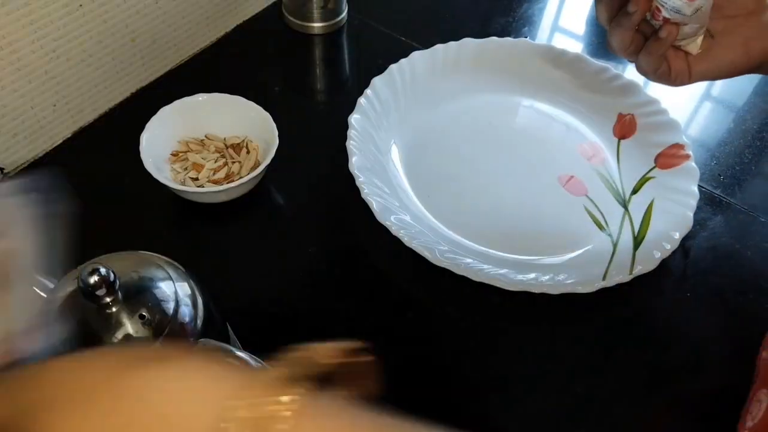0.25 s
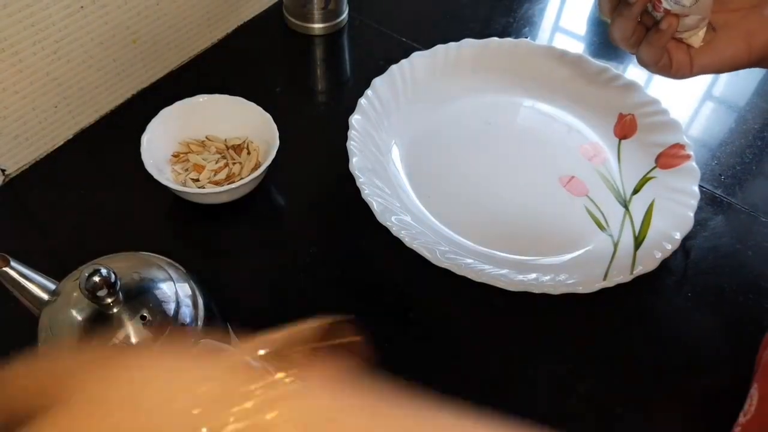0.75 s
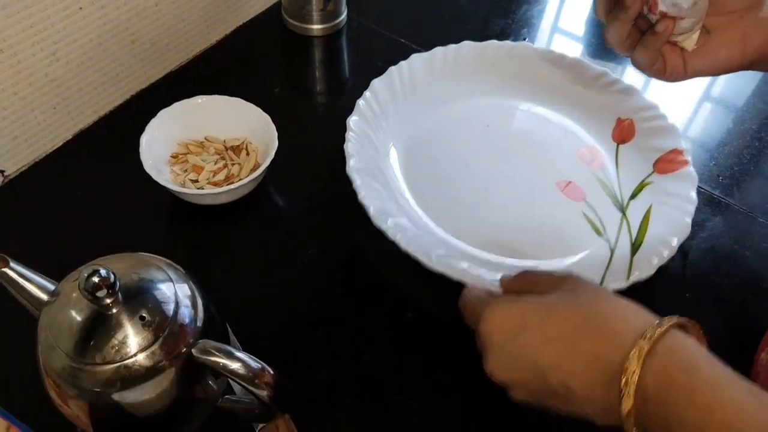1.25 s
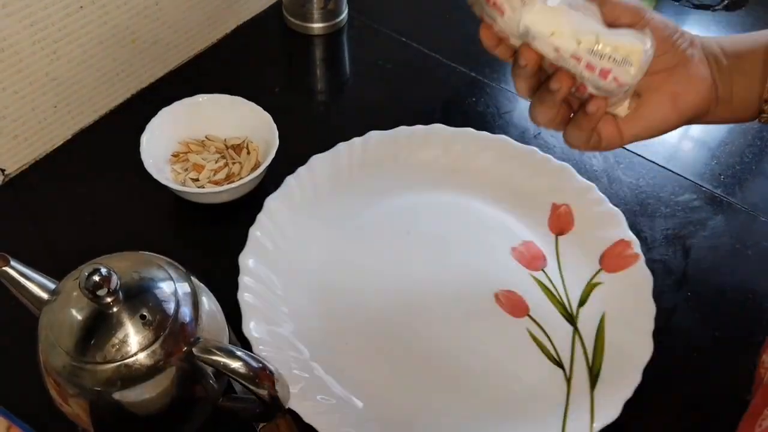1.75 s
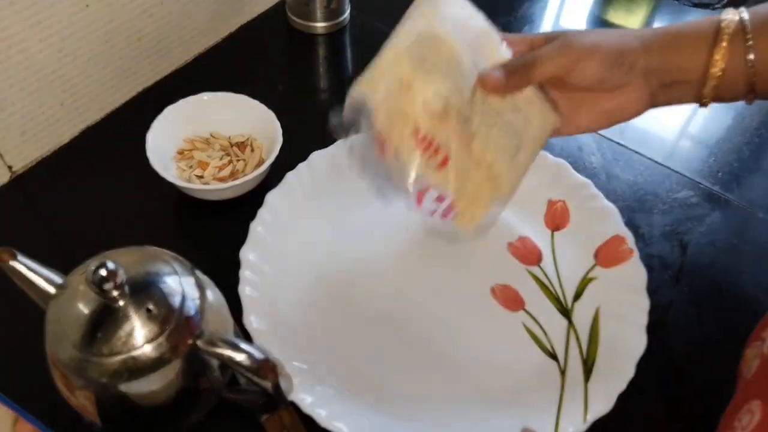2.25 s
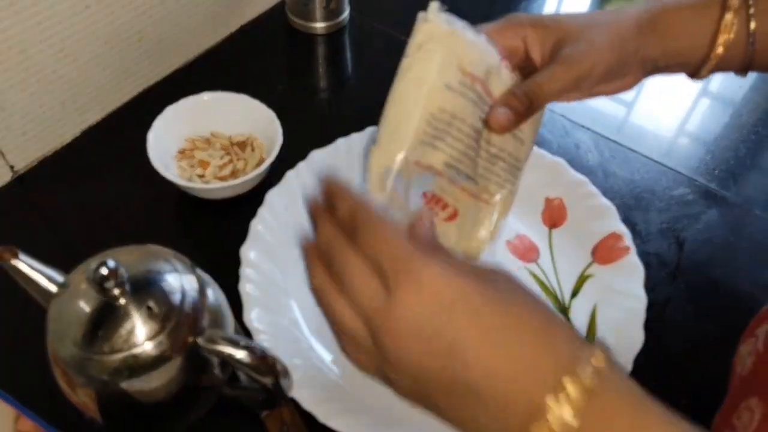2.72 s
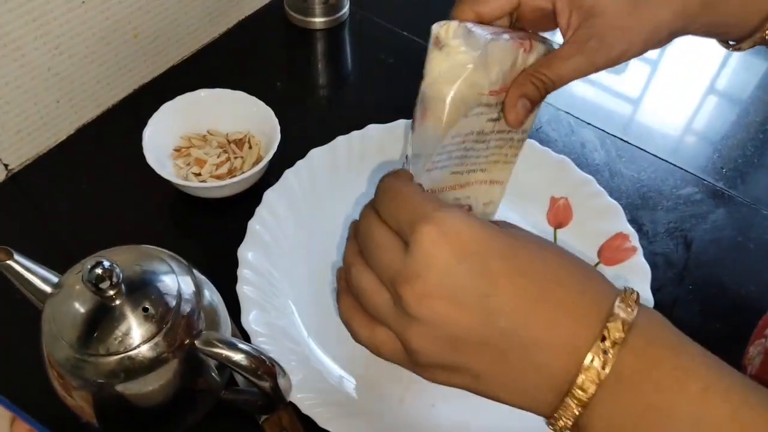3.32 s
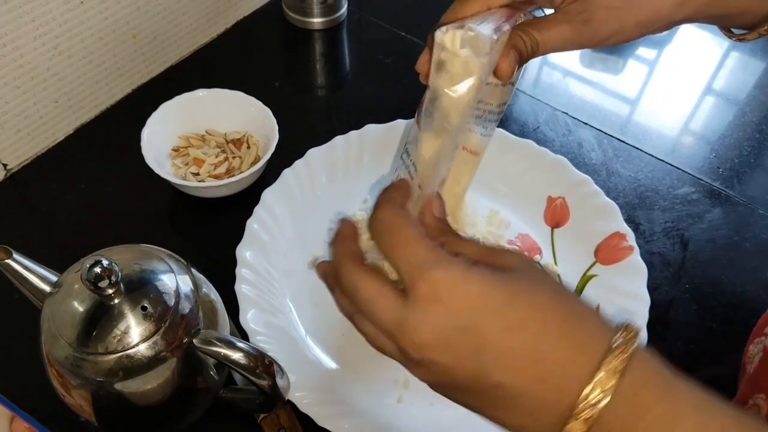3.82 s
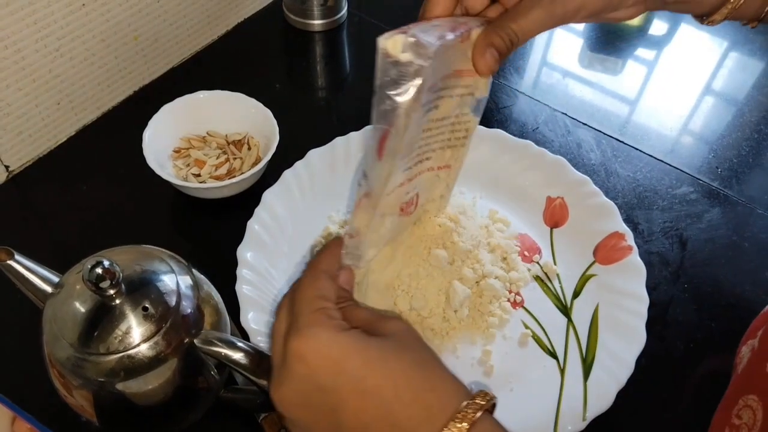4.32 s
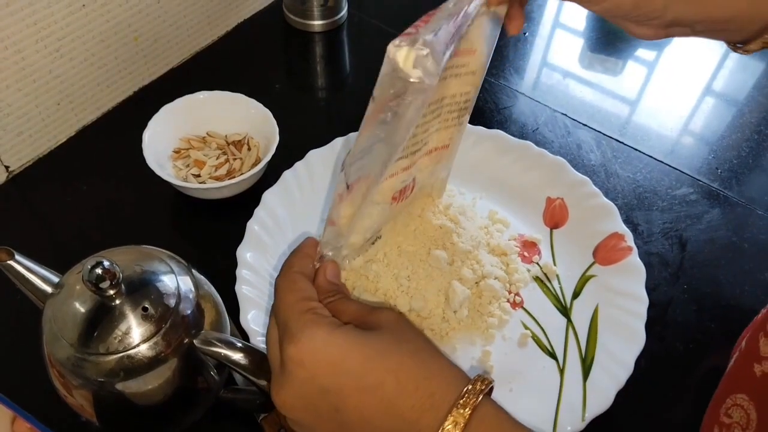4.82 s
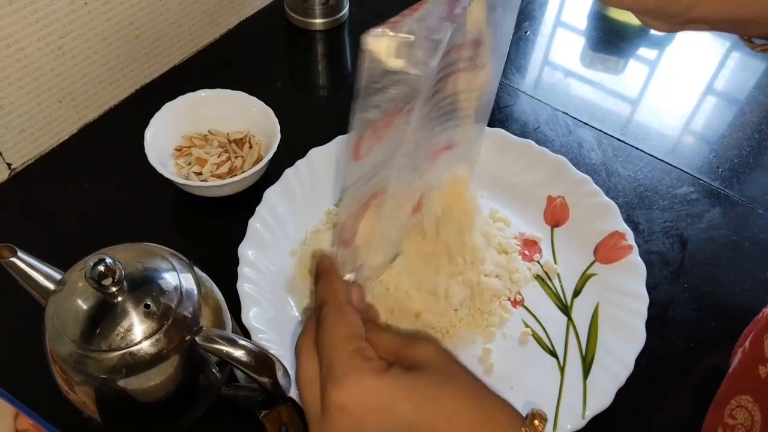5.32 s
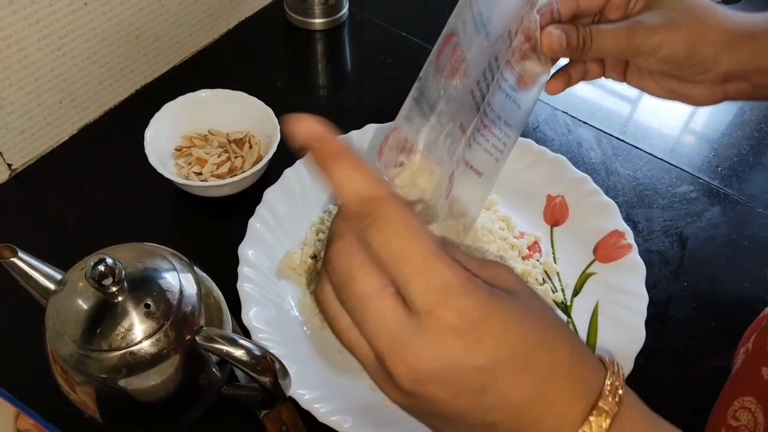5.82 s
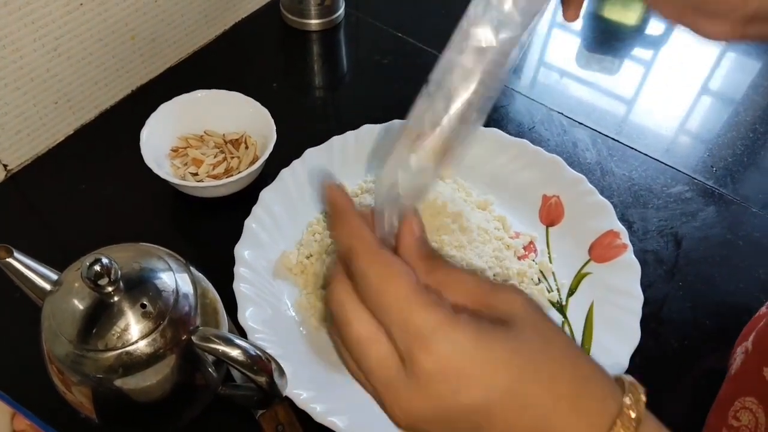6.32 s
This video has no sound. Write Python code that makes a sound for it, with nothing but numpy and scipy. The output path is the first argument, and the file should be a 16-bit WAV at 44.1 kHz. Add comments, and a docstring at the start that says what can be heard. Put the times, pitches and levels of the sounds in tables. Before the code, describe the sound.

In a small hard-walled kitchen with a steady low fan drone, an outer packet crackles briefly and lands with a soft thud. A sharp hollow knock and lighter bumps hit the counter, then a plate is dragged with a gritty, ringing rasp. After that a thin plastic pouch crinkles and snaps continuously while powder slumps out in soft, dull thumps. Close stereo microphones.

```python
"""A kitchen counter from close above: a fan drones while an outer packet crackles and is dropped aside.
A bangled wrist knocks the counter, and a plate is gripped and dragged nearer. Then a thin plastic pouch
crackles while powder slumps out of it. Rubbing, crackling and hissing are shaped noise; knocks and thumps
add fading sine waves. Hard walls answer, and two microphone ports differ in treble and phase."""
import sys
import numpy as np
from scipy import signal
from scipy.fft import rfft, irfft, next_fast_len
from scipy.io import wavfile
from scipy.ndimage import map_coordinates

SR = 44100
rng = np.random.default_rng(int(sys.argv[2]) if len(sys.argv) > 2 else 0)


def pcm_store(signal):
    """Save signal as 16-bit PCM."""
    levels = np.round(np.clip(np.atleast_2d(signal), -1, 1) * 32767)
    wavfile.write(sys.argv[1], SR, levels.astype(np.int16).T)


N = 289291  # length in samples

# How hard the packet, then the pouch, is worked, one list each: start_s [s], crackle_level_db [dB]
HANDLING = [
    [(0.0, -70.5), (0.05, -61), (0.105, -66), (0.13, -78), (0.62, -81.5)],
    [(1.8, -92), (1.92, -71), (2.04, -72), (2.27, -58), (2.6, -63.5), (2.78, -59), (2.86, -44.5),
     (2.95, -45.5), (3.12, -52.5), (3.23, -78), (3.31, -44.5), (3.5, -50.5), (3.75, -47), (4.13, -48),
     (4.37, -72), (4.59, -47.5), (4.8, -60), (5.07, -53), (5.21, -49), (5.28, -61), (5.42, -40),
     (5.55, -63.5), (6.04, -49), (6.25, -64.5), (6.41, -50), (6.56, -60.5)],
]
# Tone of thin plastic film: pitch_hz [Hz], level_db [dB per Hz]
FILM_TONE = [(290, -28), (500, -0.5), (560, -33), (976, 5), (1450, -8.5), (1570, -4.5), (2330, -1),
             (2800, 0.5), (4990, -4.5), (7500, -18), (9750, -38), (16500, -120)]
# Tone of bright treble hiss: pitch_hz [Hz], level_db [dB per Hz]
SHEEN_TONE = [(3000, -5), (6000, -0.5), (8000, 1), (12000, 0), (15500, -1.5), (17000, -20)]


def amp(db):
    """Turn a level in dB into a gain to multiply by."""
    return 10 ** (np.asarray(db) / 20)


def unit(x):
    """Scale x to an average strength (rms) of 1."""
    return x / np.sqrt(np.mean(x ** 2) + 1e-20)


def along(points, hz):
    """Read a curve of (Hz, value) points, with pitch spaced as the ear hears it (log axis)."""
    point_hz, values = np.transpose(points)
    return np.interp(np.log(hz + 1), np.log(point_hz + 1), values)


def level(rows):
    """Level in dB for every sample from (s, dB) rows, silent outside them."""
    return np.interp(np.arange(N) / SR, *np.transpose(rows), left=-300, right=-300)


def follows(rows, db, grows):
    """Gain of a layer that sits at db and moves, grows dB per dB, with a level curve about its mean."""
    return amp(db + grows * (level(rows) - np.mean(rows, axis=0)[1]))


def wobble(rate):
    """A smooth random curve with rate random points a second."""
    points = rng.standard_normal(int(N * rate / SR) + 4)
    return map_coordinates(points, [np.arange(N) * rate / SR])


def filtered(x, response):
    """Change the strength and phase of each frequency in x by a response."""
    n = x.shape[-1]
    padded = next_fast_len(n + 4096)
    return irfft(rfft(x, padded) * response(np.fft.rfftfreq(padded, 1 / SR)), padded)[..., :n]


def coloured(x, spectrum):
    """Shape the tone of x by (Hz, dB) points, at rms 1."""
    return unit(filtered(x, lambda hz: amp(along(spectrum, hz))))


def resonance(hz, sharpness):
    """Response of one damped vibration, 1 at its peak; sharper means a narrower peak and a longer ring."""
    return lambda f: 1j * f * hz / sharpness / (hz * hz - f * f + 1j * f * hz / sharpness)


def near(count, alike):
    """Noise from a broad source close by: each port hears a somewhat different part of it."""
    shared, own = rng.standard_normal((2, count))
    turn = np.arccos(np.clip(alike, 0, 1)) / 2
    return np.cos(turn) * shared + np.sin(turn) * np.array([own, -own])


def diffuse(pair):
    """Make two unrelated signals as alike as sound from all around is at the two ports."""
    # Likeness of the two ports: pitch_hz [Hz], likeness [0 to 1]
    likeness = [(60, 1), (300, 0.89), (700, 0.11), (3000, 0.11), (10000, 0.22)]

    def turn(hz):
        return np.arccos(np.clip(along(likeness, hz), -1, 1)) / 2

    mid, side = filtered(pair, lambda hz: np.array([np.cos(turn(hz)), np.sin(turn(hz))]))
    return np.array([mid + side, mid - side])


def add(track, s, sound):
    """Mix a sound into both channels from s seconds on."""
    part = track[:, round(s * SR):][:, :sound.shape[-1]]
    part += sound[..., :part.shape[1]]


def burst(t, lead, rise, crack_t60, t60, tail_db):
    """Noise with a soft onset before t = 0, a crack, and a weaker, longer shiver (t60: time to fall 60 dB)."""
    after = np.maximum(t, 0)
    fade = amp(-60 * after / crack_t60) + amp(tail_db - 60 * after / t60)
    shape = (1 - np.exp(-after / rise)) * fade
    onset = amp(-17.5) * np.exp(-np.abs(t) / lead)
    return near(len(t), alike=0.3) * (shape + onset)


def fan():
    """A steady drone with a slight swell: shaped noise that reaches the ports from all around."""
    # Tone of the fan: pitch_hz [Hz], level_db [dB per Hz]
    fan_tone = [(20, -28), (45, -9), (80, -1), (115, -7), (150, -23.5), (200, 1), (235, -10), (270, -3.5),
                (330, -11), (500, -21), (950, -14), (1500, -24), (3000, -30), (6200, -44.5), (15000, -46.5),
                (16500, -60)]
    drone = coloured(diffuse(rng.standard_normal((2, N))), fan_tone)
    swell_db = 0.3 * wobble(3.92)
    return amp(-54.5 + swell_db) * drone


def creases(rate, life):
    """Noise broken into clumped ticks, about rate a second, over the hiss of film sliding on film."""
    size = amp(0.74 * rng.exponential(size=N).clip(0, 2.5))
    chance = rate * amp(5 * wobble(25)) / SR  # rises and falls, so the ticks clump
    ticks = (rng.random(N) < chance) * size
    shiver = signal.lfilter([1], [1, -np.exp(-1 / (life * SR))], ticks)  # each tick fades over life seconds
    hiss = amp(-27.5 + 10.4 * wobble(30))
    return near(N, alike=0.2) * (unit(shiver) + hiss)


def rustle():
    """Plastic panels of three sizes crackle on their own; a bright sizzle goes with all of them."""
    sizzle_db, sizzle_grows = -56.5, 0.73  # full pouch at its mean crackle; dB per dB of crackle
    sizzle_fades_db_per_s = 2.5  # the emptier the pouch, the duller it slides
    packet, pouch = HANDLING
    panels = [creases(rate=150, life=0.0043) for _ in range(3)]
    pitches_hz = (1700, 2900, 4700)
    body = sum(filtered(x, resonance(hz, sharpness=2.8)) for x, hz in zip(panels, pitches_hz))
    crackle_gain = amp(level(packet)) + amp(level(pouch))
    pouch_time = np.arange(N) / SR - pouch[0][0]
    pouch_sizzle = follows(pouch, sizzle_db - sizzle_fades_db_per_s * pouch_time, sizzle_grows)
    sizzle_gain = amp(level(packet)) + pouch_sizzle
    return crackle_gain * coloured(body, FILM_TONE) + sizzle_gain * coloured(sum(panels), SHEEN_TONE)


def kitchen(x):
    """Walls answer: each frequency dies at its own speed, with a fresh random echo pattern every 0.2 s."""
    # How long the room rings: pitch_hz [Hz], t60_s [s to fall 60 dB]
    wall_fade = [(100, 0.15), (400, 0.26), (1000, 0.25), (3000, 0.22), (8000, 0.17), (15000, 0.18)]
    out, step = np.zeros((2, N)), SR // 5
    for start in range(0, N, step):
        hz, t, z = signal.stft(rng.standard_normal((2, SR // 2)), SR, nperseg=256)
        fade = amp(-60 * t / along(wall_fade, hz)[:, None])
        tail = diffuse(signal.istft(z * fade, SR, nperseg=256)[1])
        tail = tail / np.linalg.norm(tail[0])
        answer = signal.fftconvolve(x[None, start:start + step], tail, axes=1)
        add(out, start / SR + .003, answer)  # the answer comes 3 ms late
    return out


def snaps():
    """A crease buckles: a tick pitched by the panel that flips; longer ones start softer and shiver longer."""
    # Film creases: start_s [s], peak_db [dB], pitch_hz [Hz], low_db [dB], treble_db [dB],
    # length_s [s, scales the onset, crack and shiver]
    crease_events = [(0.0797, -32, 2900, 0, 15, 0.024), (0.1181, -48, 1290, -13, -11, 0.021),
                     (0.4304, -51, 1290, -11, -0.5, 0.024), (0.4494, -43.5, 1330, -13, 5, 0.028),
                     (0.4658, -35, 1190, -10, 24, 0.033), (1.9516, -33.5, 5030, -17, 8, 0.035),
                     (2.102, -23, 3400, -11, 5, 0.023), (2.15, -30, 3570, -23, 2, 0.024),
                     (2.17, -29.5, 2220, -19, -2, 0.018), (2.2198, -31.5, 5060, -20, -7, 0.021),
                     (2.254, -28.5, 2720, -13, 6.5, 0.029), (2.2972, -28, 3650, -13, 7, 0.032),
                     (2.3211, -28, 3020, -19, 6, 0.037), (2.4222, -31, 3200, -1, 13, 0.024),
                     (2.5692, -36.5, 3320, -16, -7, 0.024), (2.61, -41, 3200, -15, -11, 0.017),
                     (2.7014, -29.5, 2500, -20, 3, 0.02), (2.8792, -20, 3540, -13, 7, 0.026),
                     (2.8988, -25.5, 2850, -5, 4, 0.021), (2.9375, -21.5, 2760, -8, 3, 0.031),
                     (2.9597, -23.5, 3300, -16, 2, 0.021), (3.0006, -39, 4700, -13, -0.5, 0.024),
                     (3.0378, -33, 1590, -10, -2, 0.028), (3.0748, -25.5, 3400, -7, 5, 0.019),
                     (3.1082, -26, 3470, -27, -4, 0.023), (3.124, -32.5, 4060, -21, -0.5, 0.024),
                     (3.1687, -36, 2680, -13, 5, 0.027), (3.2365, -36.5, 3640, -13, -3, 0.026),
                     (3.2841, -26, 3440, -8, 0, 0.03), (3.3073, -24.5, 2720, -22, 0, 0.016),
                     (3.3633, -24, 3140, -5, -2, 0.026), (3.4003, -23, 5230, -17, 13, 0.034),
                     (3.428, -38, 2720, -24, -20, 0.026), (3.53, -24.5, 3420, -9, 9, 0.029),
                     (3.5437, -30, 4660, -9, 1, 0.029), (3.5843, -35, 2920, -15, -9, 0.022),
                     (3.6391, -33, 3350, 5, 9, 0.024), (3.6965, -26, 1570, -13, -1, 0.025),
                     (3.7458, -19.5, 4930, -22, 1, 0.021), (3.7686, -18.5, 3950, -19, 3, 0.026),
                     (3.7921, -23, 3020, -13, 2, 0.027), (3.8104, -27, 3100, -11, -3, 0.024),
                     (3.8786, -29.5, 2820, -10, -16, 0.021), (3.9065, -32, 3350, -9, -10, 0.022),
                     (3.9245, -25, 3420, -11, -0.5, 0.024), (3.9951, -20.5, 2920, -15, -1, 0.02),
                     (4.0205, -21.5, 2980, -5, 3.5, 0.029), (4.0996, -29.5, 2080, -16, -0.5, 0.026),
                     (4.1648, -36.5, 4440, -11, 5, 0.024), (4.1945, -25, 4940, -15, 6, 0.028),
                     (4.2165, -19, 3370, -18, -0.5, 0.029), (4.2307, -22.5, 3080, -13, 4, 0.024),
                     (4.2419, -24.5, 2620, -7, -0.5, 0.028), (4.2824, -25.5, 2500, -11, 3, 0.019),
                     (4.3075, -29, 4670, -3, -7, 0.025), (4.3833, -23.5, 2930, -8, -1.5, 0.024),
                     (4.3958, -26, 3020, -19, -0.5, 0.034), (4.4797, -33, 4200, -8, 18, 0.022),
                     (4.5256, -30, 3090, -10, -10, 0.016), (4.5405, -21.5, 2800, -10, -3, 0.03),
                     (4.5688, -24, 2700, -1, -0.5, 0.038), (4.6149, -23.5, 3300, -6, -0.5, 0.024),
                     (4.6283, -24, 3110, -13, -0.5, 0.027), (4.6442, -17, 4800, -13, 4.5, 0.026),
                     (4.66, -24, 2820, -16, -3.5, 0.029), (4.7446, -21, 5000, -13, 1, 0.022),
                     (4.7671, -30, 2780, -20, -2, 0.029), (4.999, -23.5, 4300, -10, -4, 0.012),
                     (5.0295, -33.5, 3960, -3, -0.5, 0.015), (5.0478, -23.5, 2720, -9, -10, 0.019),
                     (5.0584, -27, 2780, -8, -16, 0.019), (5.0785, -20.5, 2880, -17, -5, 0.016),
                     (5.1012, -16.5, 4060, -7, 6, 0.021), (5.1384, -19, 4230, -31, -2, 0.021),
                     (5.1502, -26, 3870, -15, 3, 0.024), (5.1686, -25, 3950, -13, -0.5, 0.021),
                     (5.1846, -26, 2820, -13, -10, 0.023), (5.2048, -20, 2490, -5.5, -8.5, 0.028),
                     (5.22, -17, 3200, -2, 2, 0.022), (5.2951, -19, 2740, -16, -6, 0.021),
                     (5.3085, -26, 3160, -12, -5, 0.033), (5.3433, -24.5, 3160, -13, -21, 0.056),
                     (5.3681, -19, 3100, -5.5, -1.5, 0.028), (5.4066, -23, 2900, -18, 11, 0.024),
                     (5.4344, -29, 3360, -23, -7, 0.024), (5.4604, -18.5, 3320, -13, -4, 0.022),
                     (5.4809, -16.5, 3200, -18, -0.5, 0.019), (5.5059, -19, 1330, -18, 4, 0.024),
                     (5.6048, -26.5, 3700, -25, -9, 0.017), (5.6342, -12.5, 2680, -22, 2, 0.021),
                     (5.7304, -30, 3100, -18, -2, 0.026), (5.7404, -30.5, 3020, -26, -4, 0.025),
                     (5.7766, -33.5, 2850, -13, -10, 0.022), (5.88, -26, 3990, -4, -8, 0.025),
                     (5.9159, -28, 5090, -9, 10, 0.026), (5.9347, -26.5, 2700, -13, -2.5, 0.037),
                     (5.9604, -23.5, 2670, -13, 6, 0.027), (6.108, -8, 2880, -13, -15, 0.014),
                     (6.323, -33.5, 2980, -4, -11, 0.026), (6.338, -26, 3150, -9, -0.5, 0.02),
                     (6.3524, -25, 1710, -13, -3, 0.027), (6.366, -23.5, 2020, -16, 7, 0.026),
                     (6.4178, -21.5, 3640, 2, 0, 0.029), (6.4289, -20, 2580, -10, -5, 0.024),
                     (6.4826, -24.5, 2430, -31, -3, 0.033), (6.5164, -24, 2040, -26, -0.5, 0.022)]
    # Tone of the pouch's large panels: pitch_hz [Hz], level_db [dB per Hz]
    belly_tone = [(350, -64), (650, -7), (1000, -8.5), (1500, 3), (2400, -22)]
    panel_edge = 0.46  # a flipping panel sends out little below this share of its pitch
    spark_share, spark_tail_db = 0.35, -4.5  # treble mostly fades in this share of the length; what lingers
    out, t = np.zeros((2, N)), np.arange(-SR // 50, SR // 8) / SR
    for s, db, pitch_hz, low_db, treble_db, length in crease_events:
        noise = burst(t, lead=0.37 * length, rise=0.028 * length, crack_t60=0.39 * length,
                      t60=2.75 * length, tail_db=-6.5)
        # The instant of buckling, sharpest in short ticks.
        noise[:, SR // 50] += 3.24 * (0.017 / length) ** 0.83
        thin = filtered(noise, lambda f: f ** 2 / (f ** 2 + (panel_edge * pitch_hz) ** 2))
        spark = noise * (amp(-60 * np.abs(t) / (spark_share * length)) + amp(spark_tail_db))
        click = unit(filtered(noise, resonance(pitch_hz, sharpness=12.0)))
        click += amp(1.0) * coloured(thin, FILM_TONE)
        click += amp(low_db) * coloured(noise, belly_tone)
        click += amp(treble_db) * coloured(spark, SHEEN_TONE)
        add(out, s + t[0], amp(db) * click / np.abs(click).max())
    return out


def knocks():
    """Each blow: a broad crack coloured by the contact, the thud of what lands, and the ringing counter."""
    # Blows: start_s [s], crack_peak_db [dB], slab_db [dB], thud_db [dB], thud_pitch_hz [Hz], ring_db [dB],
    # clack_db [dB], clack_pitch_hz [Hz], treble_db [dB], shiver_t60_s [s to fall 60 dB]
    blow_events = [ (0.215, -14, -18, -3, 122, -49, 2.5, 2500, -4, 0.047),
                   (0.647, -3.5, -23.5, -27, 121, -19.5, -14, 3020, -23.5, 0.026),
                   (0.811, -22.5, -15, -10, 107, -3.5, -12.5, 2530, -26, 0.014),
                   (1.164, -18.5, -37, -20, 204, -23, -16.5, 2120, -40, 0.21),
                   (1.221, -15.5, -34.5, -33, 243, -20.5, -6.5, 2030, -33.5, 0.036)]
    # Counter's low vibrations: pitch_hz [Hz], level_db [dB], t60_s [s to fall 60 dB]
    slab_modes = [(78, -3, 0.3), (165, -10, 0.15), (191, -5, 0.24), (287, 2, 0.12), (361, 6, 0.074),
                  (502.5, -5, 0.17), (619, -5, 0.11)]
    # Counter's ringing vibrations: pitch_hz [Hz], level_db [dB], t60_s [s to fall 60 dB]
    hollow_modes = [(895, -2.5, .14), (955, 0, .15), (995, -1.5, .13), (1042, -1, .1), (1093, -5, .09),
                    (1160, -7.5, .1), (1310, -19, 0.099)]
    # Tone of the crack: pitch_hz [Hz], level_db [dB per Hz]
    blow_tone = [(240, -47), (400, -26.5), (730, -18), (921, -6), (2180, -18), (2880, -20), (6340, -33.5),
                 (14800, -62), (16000, -41)]
    out, t = np.zeros((2, N)), np.arange(-SR // 50, SR // 2) / SR
    after = np.maximum(t, 0)

    def ring(modes):
        """Fading sine waves, each a little louder or softer at every blow."""
        return sum(amp(db + rng.normal(0, 2.4) - 60 * after / t60) * np.sin(2 * np.pi * hz * after)
                   for hz, db, t60 in modes)

    for s, db, slab_db, thud_db, thud_hz, ring_db, clack_db, clack_hz, treble_db, t60 in blow_events:
        noise = burst(t, lead=.004, rise=.0006, crack_t60=.025, t60=t60, tail_db=-7)
        clack = unit(filtered(noise, lambda f: resonance(clack_hz, sharpness=1.2)(f) ** 2))
        crack = coloured(noise, blow_tone) + amp(clack_db) * clack
        crack += amp(treble_db) * coloured(noise, SHEEN_TONE)
        low = amp(slab_db) * ring(slab_modes) + amp(thud_db) * ring([(thud_hz, 0, .15)])
        soft_start = 1 - np.exp(-after / 0.0055)
        body = low * soft_start + amp(ring_db) * ring(hollow_modes)
        add(out, s + t[0], amp(db) * (crack / np.abs(crack).max() + body))
    return out


def drag():
    """The plate's foot rubs the stone: a gritty rasp, and resonances trading strength as the grip shifts."""
    # Plate sliding: start_s [s], ring_level_db [dB]
    slide = [(1.24, -60), (1.27, -51), (1.39, -45), (1.52, -41.5), (1.68, -53.5), (1.76, -64), (1.83, -87)]
    # Plate's resonances: pitch_hz [Hz], width_hz [Hz], level_db [dB, before the treble tilt]
    plate_modes = [(694, 61, -7), (1130, 92, -2), (1250, 25, -3), (1990, 86, -6), (2240, 83, -5),
                   (2930, 120, 0), (3480, 88, 0), (3880, 38, -14), (4330, 94, -9), (4650, 120, -10),
                   (5470, 39, -12), (5990, 54, -11), (6700, 96, -15), (7000, 41, -13), (7320, 34, -16),
                   (8450, 100, -21), (8700, 44, -15), (9610, 32, -21), (10000, 73, -19), (10600, 75, -22),
                   (12000, 56, -16), (12800, 77, -21), (14200, 170, -24), (14900, 43, -24)]
    # Tone of the rasp: pitch_hz [Hz], level_db [dB per Hz]
    rasp_tone = [(290, -46), (500, -12), (1130, 2.5), (1380, -3), (3490, -4), (3860, -17), (5090, -13),
                 (12300, -27), (15100, -25), (16000, -52)]
    tilt_db = 1.5  # per octave: rubbing excites the high modes a little more
    rasp_over_ring_db, rasp_grows = 0, 2.1  # at the loudest moment; it swells and fades faster than the ring

    def grit():
        return near(N, alike=0.29) * amp(1.5 * wobble(59.92))

    def group(k):
        """Every seventh resonance, rubbed by its own grit."""
        def response(f):
            return sum(amp(db + tilt_db * np.log2(hz / 3000)) * resonance(hz, hz / width_hz)(f)
                       for hz, width_hz, db in plate_modes[k::7])
        return filtered(grit(), response)

    rings = sum(amp(5.1 * wobble(13.97)) * group(k) for k in range(7))
    ring_db = level(slide)
    rasp_db = ring_db.max() + rasp_over_ring_db + rasp_grows * (ring_db - ring_db.max())
    return amp(rasp_db) * coloured(grit(), rasp_tone) + amp(ring_db) * unit(rings)


def slump():
    """Soft low lumps as powder shifts, rounded thumps where heaps land, and the handled counter's rumble."""
    # Heaps of powder landing: start_s [s], level_db [dB, before the fade], pitch_hz [Hz]
    landings = [(2.93, -39.5, 413), (3.038, -30.5, 338), (3.698, -33, 367), (4.211, -27.5, 332),
                (4.239, -25, 333), (4.28, -40, 370), (4.616, -34.5, 317), (5.102, -40, 292),
                (5.219, -29.5, 363), (5.308, -40, 243), (5.369, -28, 340), (5.634, -37, 320),
                (5.657, -38, 348)]
    # Tone of the lumps: pitch_hz [Hz], level_db [dB per Hz]
    lump_tone = [(60, -28), (120, -13), (250, -8.5), (340, -3.5), (460, -13), (650, -36)]
    # Tone of the counter's rumble: pitch_hz [Hz], level_db [dB per Hz]
    rumble_tone = [(20, -3), (45, -9), (80, -10), (130, -9.5), (200, -28.5)]
    # Strength of the rumble: start_s [s], level_db [dB]
    shaking = [(1.88, -70), (2.9, -60), (3.4, -62), (3.8, -62), (4.2, -49), (4.7, -64), (5.25, -52),
               (5.7, -66), (6.56, -61)]
    thump_t60_s = 0.047  # time to fall 60 dB
    lumps_db, lumps_grow = -59, 0.74  # at the mean crackle; dB per dB of crackle
    out, t = np.zeros((2, N)), np.arange(SR // 5) / SR
    for s, db, pitch_hz in landings:
        fade = amp(db - 60 * t / thump_t60_s + 2.8 * wobble(136)[:len(t)])  # slightly uneven
        soft_start = 1 - np.exp(-t / 0.0011)
        add(out, s, fade * soft_start * np.sin(2 * np.pi * pitch_hz * t))
    lumps = unit(amp(2.8 * wobble(31) + 1.5 * wobble(6)) * coloured(near(N, alike=1.0), lump_tone))
    rumble = unit(amp(3.5 * wobble(5.5)) * coloured(near(N, alike=0.8), rumble_tone))
    return out + follows(HANDLING[1], lumps_db, lumps_grow) * lumps + amp(level(shaking)) * rumble


def scene():
    """Mix the near sources, what each sends to the walls, and the drone."""
    sliding, film, blows, plate, powder = rustle(), snaps(), knocks(), drag(), slump()
    sent = amp(-7) * blows + amp(-6.5) * plate + amp(-6.0) * film + amp(-8) * sliding + amp(-8) * powder
    direct = amp(-0.5) * (blows + plate + film + sliding + powder)
    return direct + kitchen(sent[0]) + fan()


def record(dry):
    """The ports differ in level and phase by frequency; deep bass is thin and the top is cut off."""
    # Left port over right: pitch_hz [Hz], level_db [dB]
    port_level = [(60, -10), (110, 2), (200, -1), (380, 4), (700, -3), (1290, -1), (2380, 2), (4400, 0),
                  (8120, -13), (15000, -17)]
    # How far the left port leads: pitch_hz [Hz], phase_rad [radians]
    port_phase = [(0, 0), (250, -.2), (520, -.9), (1460, -3.2), (2150, -7.2), (2900, -6.6), (3960, -5.6),
                  (6800, -8.9), (12500, -12.7), (16400, -15)]
    bass_hz, top_hz = 35, 15900  # edges of what passes

    def ports(hz):
        left_over_right = amp(along(port_level, hz)) * np.exp(1j * np.interp(hz, *np.transpose(port_phase)))
        right = 2 / np.sqrt(1 + np.abs(left_over_right) ** 2)  # both ports' power together stays even
        bass = (1j * hz / (bass_hz + 1j * hz)) ** 2
        return np.array([left_over_right * right, right]) * bass / (1 + (hz / top_hz) ** 80)

    return filtered(dry, ports)


dry = scene()
out = record(dry)
pcm_store(out)
```